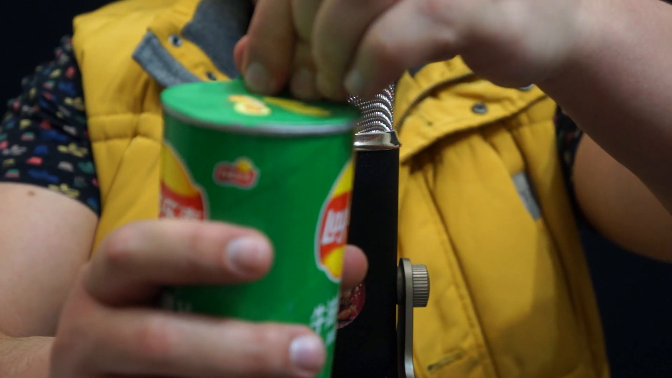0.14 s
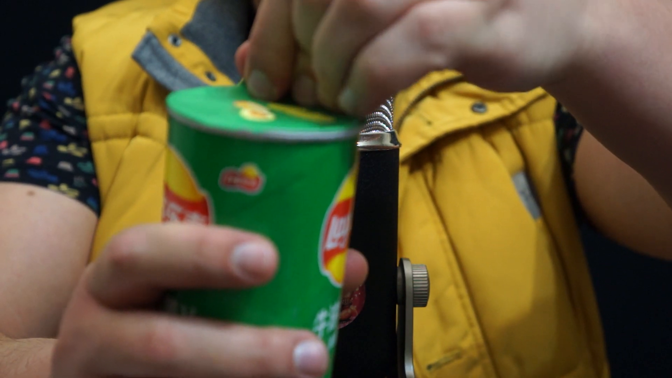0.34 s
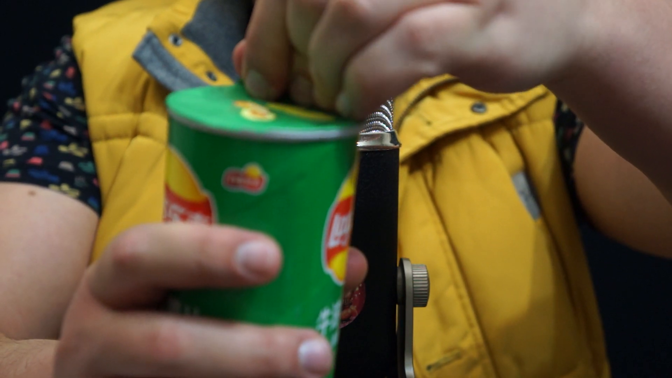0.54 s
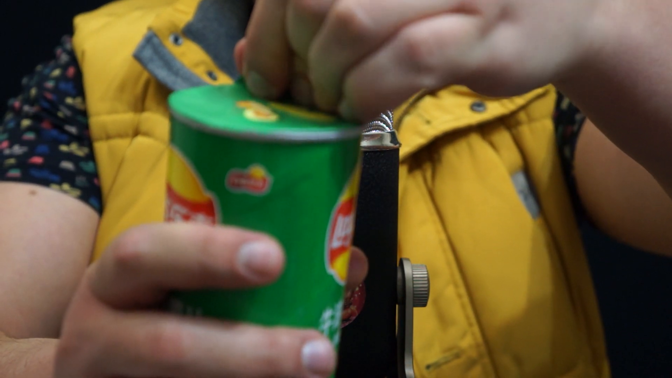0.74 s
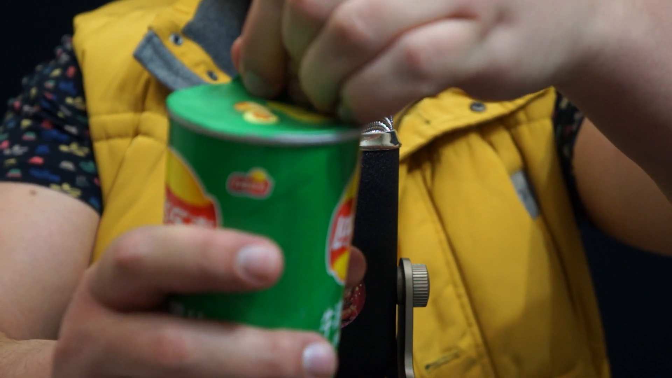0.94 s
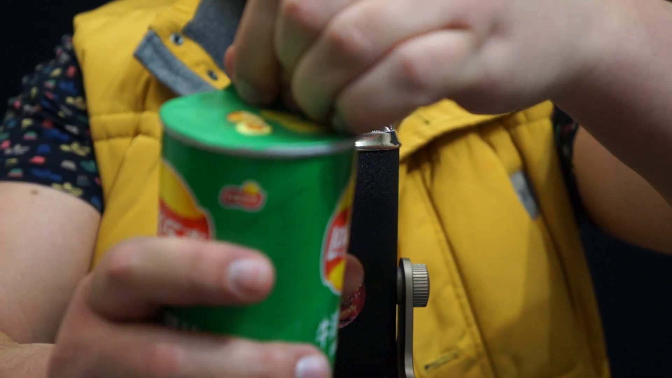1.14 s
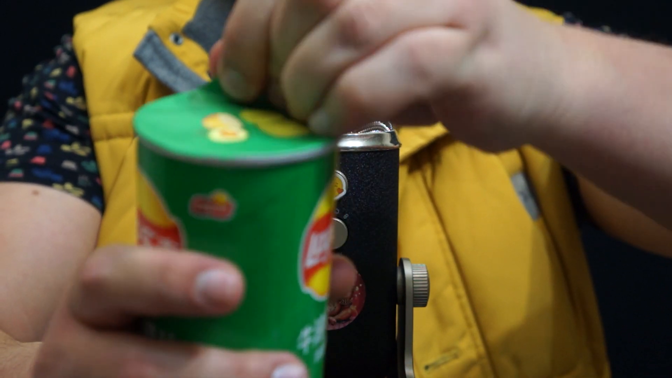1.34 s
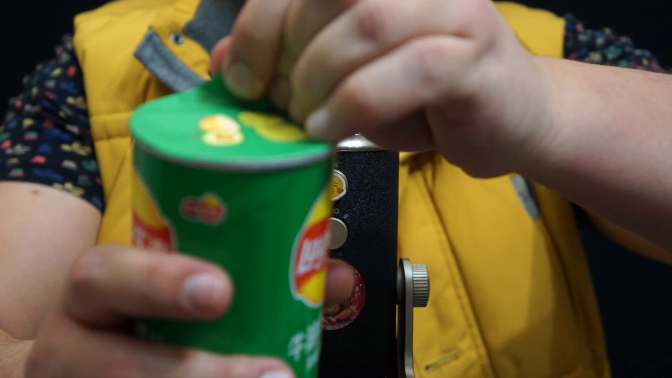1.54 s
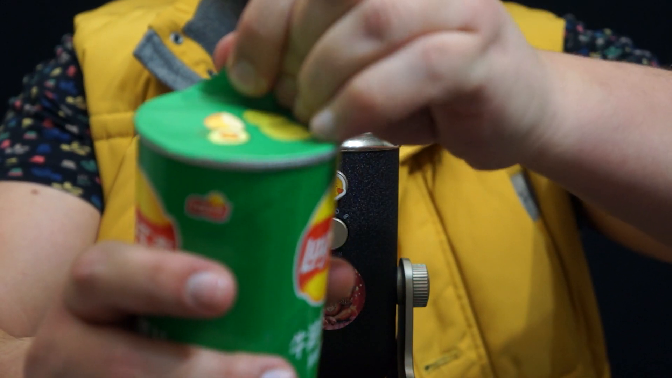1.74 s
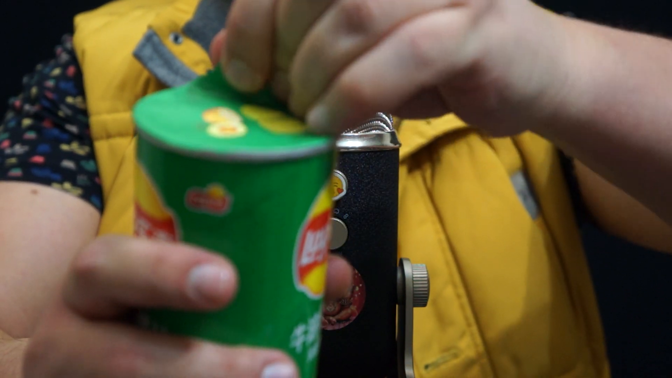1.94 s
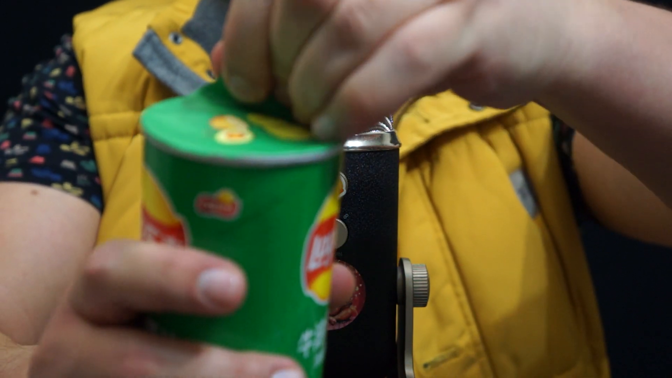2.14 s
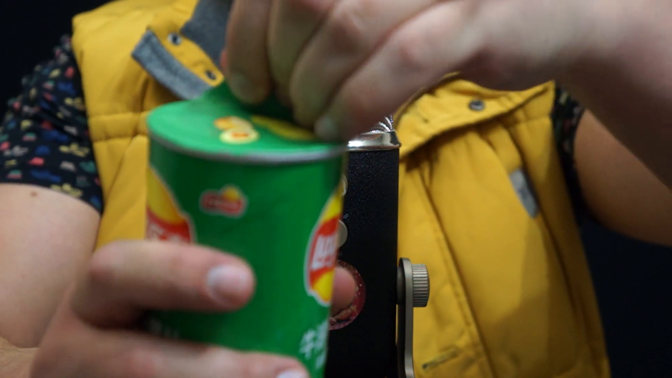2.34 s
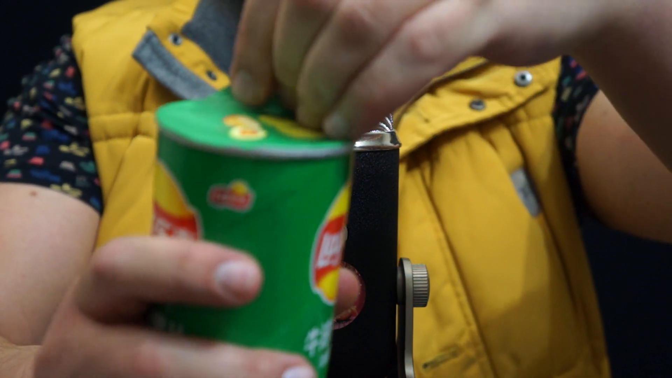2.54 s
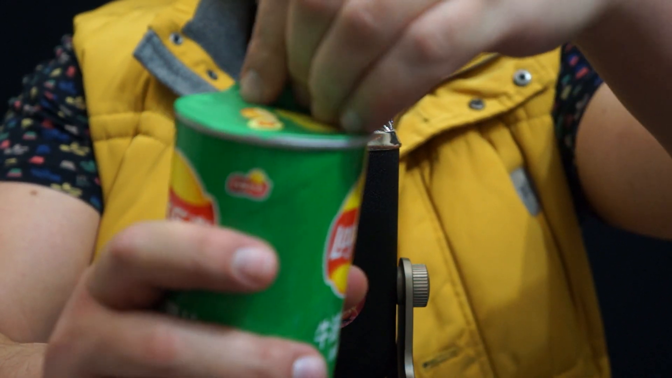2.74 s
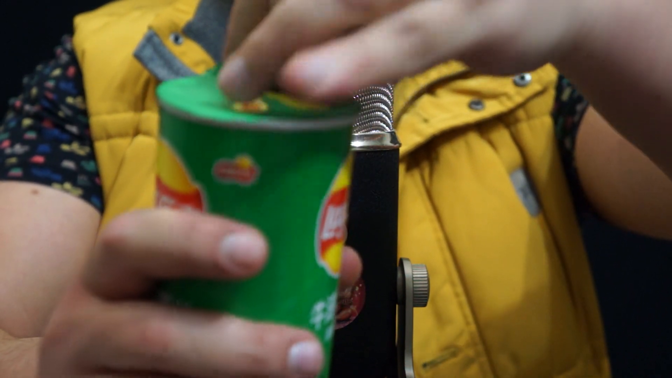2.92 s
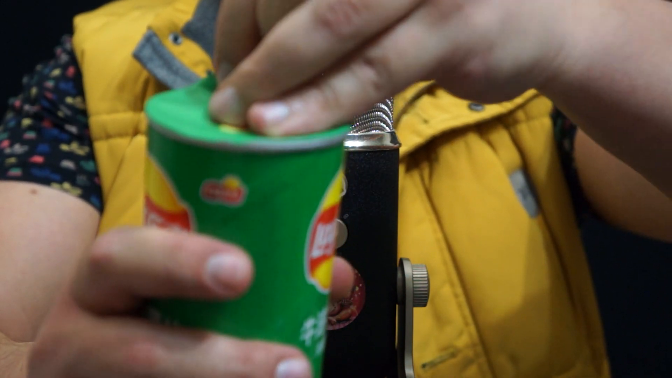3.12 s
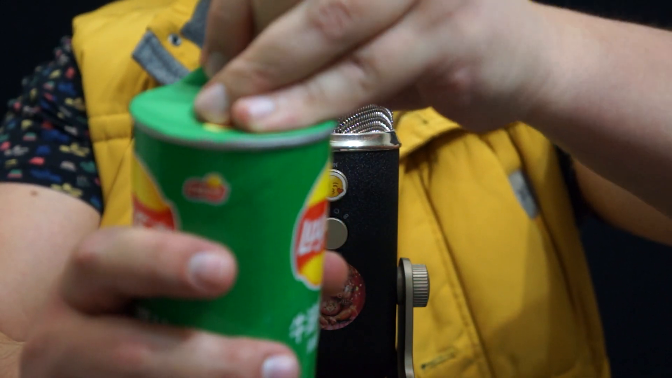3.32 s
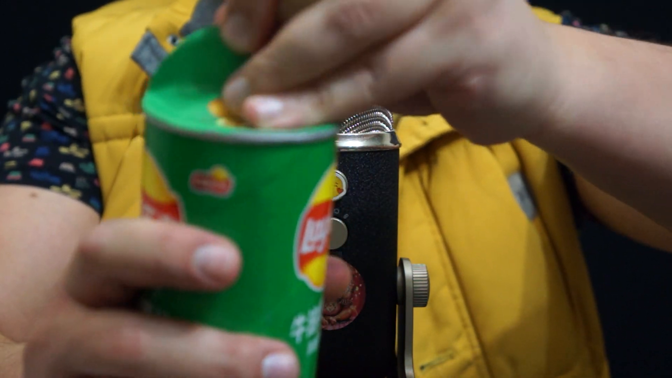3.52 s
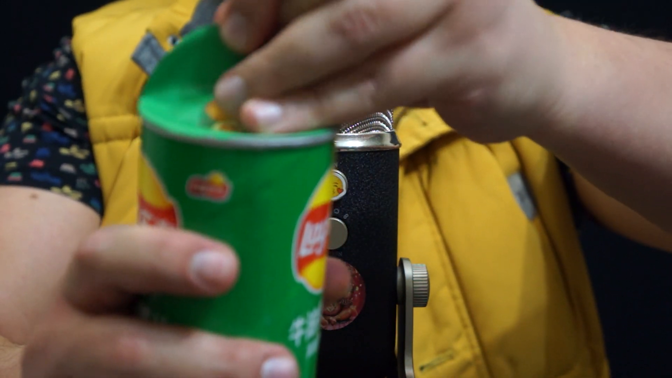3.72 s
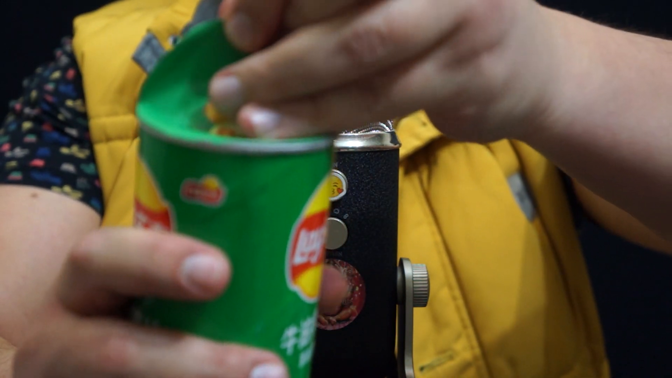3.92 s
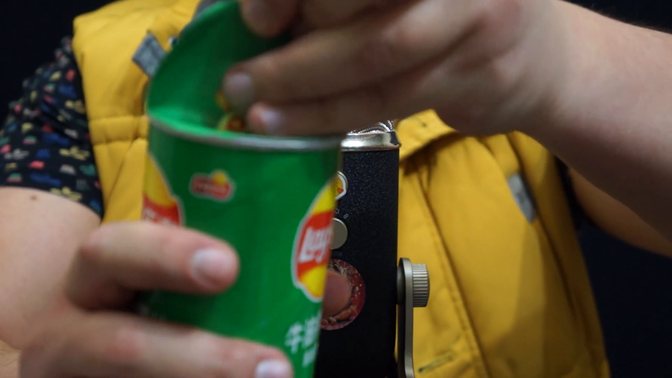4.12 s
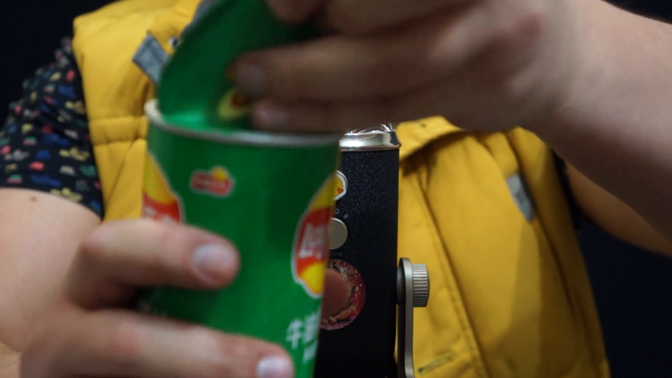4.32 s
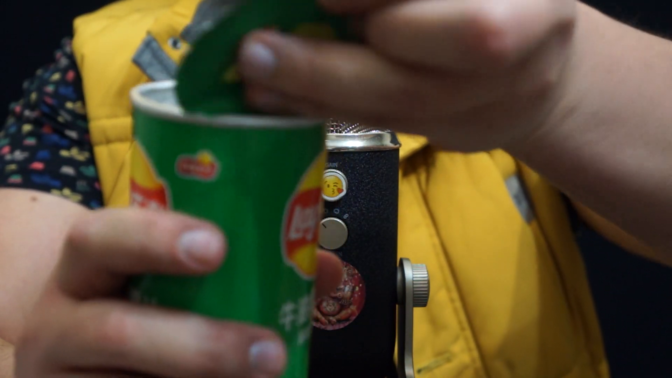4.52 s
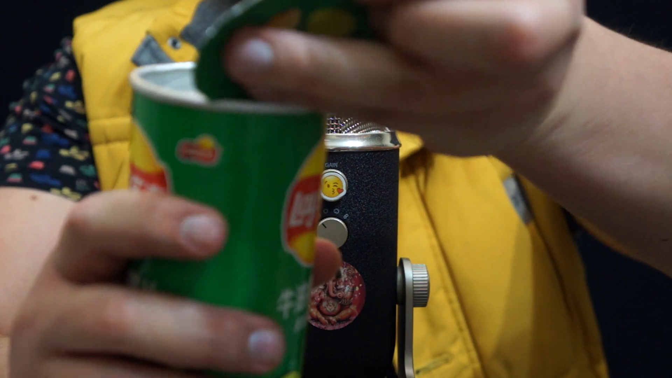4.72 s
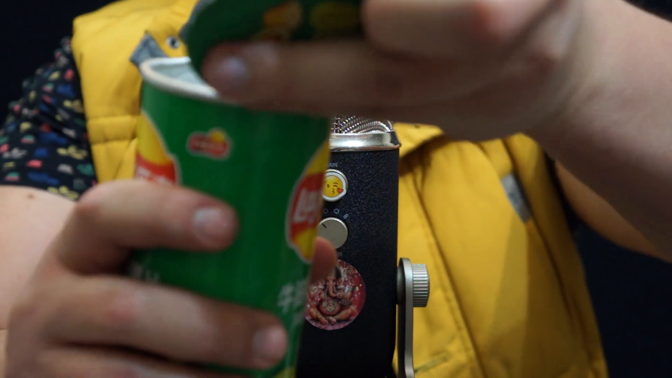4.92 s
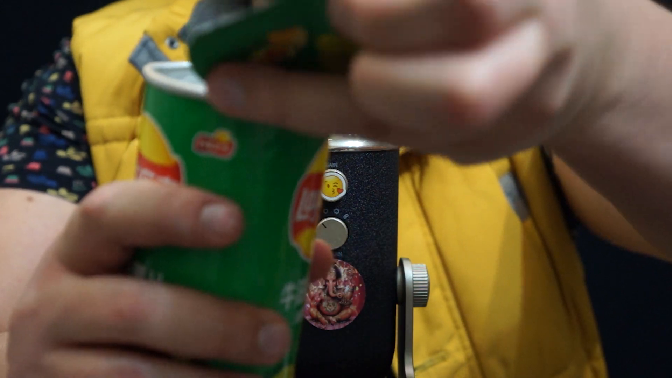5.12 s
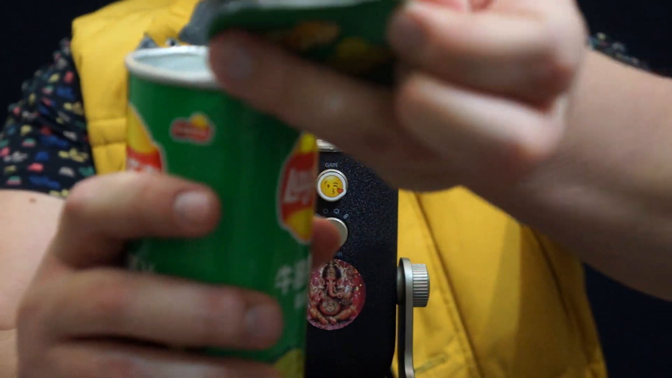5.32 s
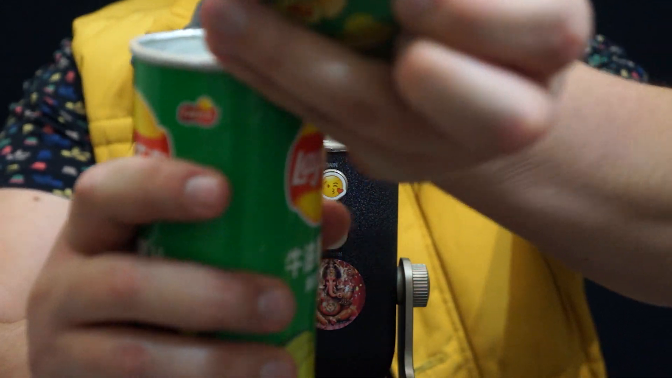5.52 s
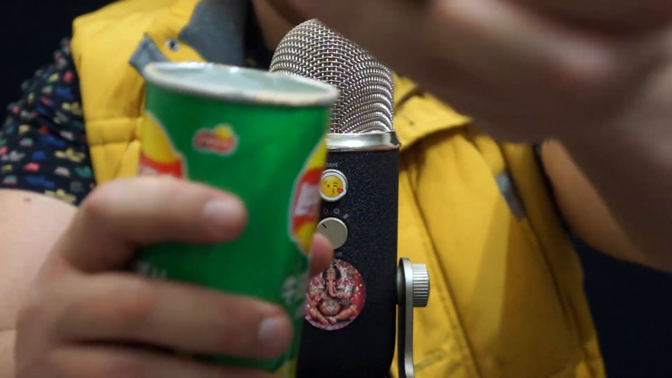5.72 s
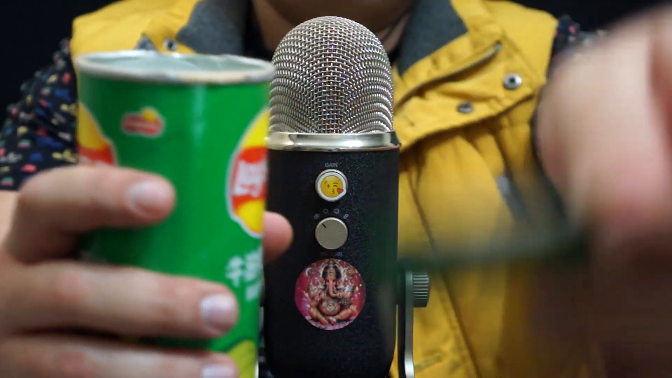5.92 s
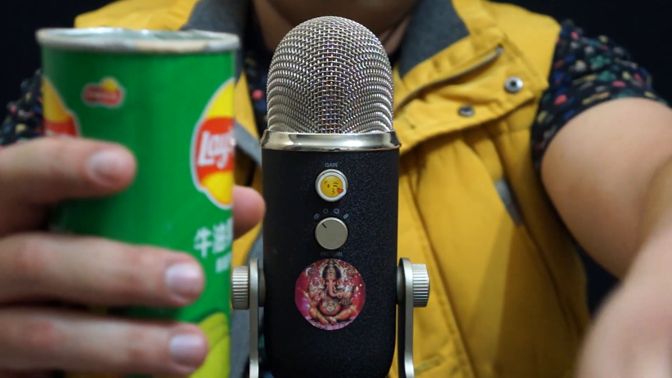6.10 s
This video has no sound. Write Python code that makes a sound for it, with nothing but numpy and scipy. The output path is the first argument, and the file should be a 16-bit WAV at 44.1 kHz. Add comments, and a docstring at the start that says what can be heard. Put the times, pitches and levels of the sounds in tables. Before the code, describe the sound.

Fingers tap and crinkle a foil seal on a cardboard can, then it rips loose with one sharp, hollow snap and rustles off, close up.

```python
"""A quiet room: a foil seal is picked at and peeled off a cardboard can close to a stereo microphone.
Fingers knock the taut foil (short drum tones), creases tick (brief noise bursts), and the foil tears off
or rustles briefly (dense crackle). Hands rustle the foil and rub the cardboard; the can's modes ring on
all of it, the lowest air tone retuned by the lid. Sparse reflections and steady hiss lie behind."""
import sys
import numpy as np
from scipy import signal
from scipy.fft import rfft, irfft
from scipy.io import wavfile
from scipy.ndimage import uniform_filter1d

SR = 44100
rng = np.random.default_rng(int(sys.argv[2]) if len(sys.argv) > 2 else 0)


def store_wav(level_fs):
    """Save 16-bit WAV to argv[1]."""
    pcm = np.round(np.clip(np.atleast_2d(level_fs), -1, 1) * 32767)
    wavfile.write(sys.argv[1], SR, pcm.T.astype(np.int16))


N = 271656

# Finger knocks on the foil drum. Each row: start in seconds, ring peak in dB, pitch in Hz,
# thump in dB re ring peak, crack in dB re ring peak.
KNOCKS = [(0.093, -57, 680, 1.5, -2), (0.231, -44, 775, 3, 7), (0.336, -55.5, 310, 11.5, -17),
          (0.455, -62.5, 660, -3, -8), (0.54, -53, 1156, -13, 2.5), (0.649, -38, 519, -7, -4.5),
          (0.771, -45.5, 570, -10, -5), (0.784, -54, 750, -22, -13), (0.814, -52, 593, -12, 2),
          (0.870, -41.5, 504, -10, -0.5), (0.905, -47, 663, -15, 6.5), (0.930, -43, 496, -32, 1.5),
          (1.189, -48.5, 1526, -7.5, 7), (1.245, -56, 332, 0, -20), (1.293, -48.5, 433, -4, -20),
          (1.343, -42, 325, -2, -13), (1.365, -46.5, 320, -17, -12), (1.375, -48, 604, -3, -12),
          (1.397, -45, 650, -2, -5), (1.461, -40, 550, -6, -4), (1.496, -41, 640, -4.5, -3.5),
          (1.733, -54, 363, 0, -2), (2.025, -49, 374, -2, -4), (2.055, -42.5, 340, 1, 1.5),
          (2.281, -44.5, 416, -4, -25), (2.334, -62, 330, -19, 14.5), (2.353, -46, 398, -28, -19),
          (2.460, -28, 701, -14, -12.5), (2.525, -46.5, 753, -18, -11), (2.539, -42.5, 590, -7, 4.5),
          (2.685, -57, 750, -12, -4), (2.771, -56.5, 970, -16, -3), (2.795, -46, 950, -19, -20),
          (2.817, -51, 860, -4, 3), (2.838, -30.5, 454, -10, -16), (3.024, -58.5, 804, 8.5, -31),
          (3.186, -49.5, 320, -7, -12), (3.223, -53, 347, 14, 13), (3.533, -24, 679, -5, -7),
          (3.572, -43.5, 740, 7, 13), (3.813, -39, 773, -3, -24), (4.094, -30.5, 753, -1, -33),
          (4.156, -39.5, 780, -5, -13), (4.18, -28, 717, -11, -45), (4.315, -49.5, 1270, -2, -17),
          (4.338, -47, 776, 5, -4), (4.366, -37.5, 787, -2.5, -36), (4.399, -42.5, 870, -6, -17),
          (4.46, -64, 664, -16, -15), (4.615, -49, 693, 1.5, 3), (4.784, -54.5, 657, 12, -13),
          (5.26, -56.5, 352, 3, -1), (5.673, -39, 570, 6, 1)]


def knocks():
    """Two short drum tones of the foil, a broad push of the whole can, a fingertip crack, a rattle inside."""
    out, t = np.zeros((2, N)), np.arange(4000) / SR
    decay_s, push_hz, rattle_db = 0.0016, 180, -11.0
    for start_s, ring_db, pitch_hz, thump_db, crack_db in KNOCKS:
        tones = np.sin(2 * np.pi * pitch_hz * t) + 0.5 * np.sin(2 * np.pi * 1.667 * pitch_hz * t)
        ring = tones * (t / 0.0017) ** 1.91 * np.exp(-t / decay_s)

        swing = np.exp(2j * np.pi * push_hz * t) * t * np.exp(-t / decay_s)  # barely one swing
        # each thump gets a random left-right spread
        thump = spread(swing.imag, swing.real, rng.uniform(-1.63, 1.45))

        noise = spread(*rng.standard_normal((2, len(t))), 0.47)
        crack = coloured(noise, lambda f: -6 * np.log2((f + 1) / 1700) ** 2)
        crack = crack * t ** 2.9 * np.exp(-t / 0.0012)

        # uneven grains, 40 samples each
        grains = noise * gain_of(4.5 * np.repeat(rng.standard_normal(len(t) // 40), 40))
        rattle = evened(coloured(grains, lambda f: -3.5 * np.log2((f + 1) / 1000) ** 2))
        rattle = rattle * np.minimum(t / 0.016, 1) * np.exp(-t / 0.012)

        sound = ring / ring.max()
        sound = sound + gain_of(thump_db) * thump / swing.imag.max()
        sound = sound + gain_of(crack_db) * crack / abs(crack).max()
        sound = sound + gain_of(rattle_db) * rattle
        add(out, start_s, gain_of(ring_db) * sound)
    return out


# Crease snaps. Each row: time in seconds, level at the top of the burst in dB, centre in Hz.
TICKS = [(0.377, -51, 7900), (0.4354, -48, 12200), (0.4593, -42, 12100), (0.5445, -53.5, 5560),
         (0.5803, -41, 12200), (0.711, -39, 13700), (0.7567, -46, 13000), (0.7706, -37.5, 7810),
         (0.7941, -48, 8430), (0.939, -57, 5000), (0.994, -50.5, 7900), (1.0234, -50.5, 5330),
         (1.043, -43, 12800), (1.1234, -51, 4230), (1.334, -50, 6420), (1.3915, -43, 13800),
         (1.4003, -43, 7660), (1.4982, -46, 13100), (1.554, -43, 14100), (1.712, -48, 7440),
         (1.7221, -33.5, 14100), (1.8254, -46.5, 10900), (1.8427, -49, 8630), (1.8864, -41.5, 11800),
         (1.9637, -39.5, 11600), (2.012, -48, 11800), (2.0516, -43, 7830), (2.186, -53, 7910),
         (2.233, -52, 7760), (2.4555, -54.5, 2730), (2.4992, -49, 3710), (2.5237, -42, 4500),
         (2.651, -49.5, 4270), (2.8477, -48, 7800), (3.026, -40.5, 3790), (3.1024, -45.5, 13400),
         (3.1487, -50, 14100), (3.1862, -33.5, 14200), (3.2256, -46, 4500), (3.336, -48, 14200),
         (3.353, -47.5, 5540), (3.3917, -48, 5600), (3.4595, -56, 11900), (3.5321, -21, 3290),
         (3.5422, -12.5, 3060), (3.548, -22.5, 6600), (3.5694, -24, 2620), (3.7755, -45, 7720),
         (3.812, -41, 3610), (3.9494, -54, 4150), (4.0936, -32, 3430), (4.157, -44, 3000),
         (4.373, -35, 3520), (4.4854, -48, 5860), (4.7825, -42.5, 13200), (4.925, -42.5, 7940),
         (4.9302, -43, 13500), (5.1295, -46.5, 7160), (5.205, -46, 8720), (5.3806, -38.5, 11700),
         (5.437, -42, 8760), (5.462, -46, 6950), (5.6494, -37.5, 9050), (5.6794, -23.5, 6910),
         (5.682, -25, 4350), (5.6903, -36, 6700)]
# a snap is broad, but narrow near the strongest resonance of the foil
SNAP_OCTAVES, RUNG_OCTAVES, RUNG_HZ, RUNG_REACH_OCTAVES = 1.34, 0.46, 6940, 0.47


def ticks():
    """Each snap of a crease is a noise burst a few milliseconds long around its own centre."""
    out, t = np.zeros((2, N)), np.arange(1024) / SR
    top_s, rise_s, fall_s = 0.0022, 0.0013, 0.0021
    burst = np.exp(-((t - top_s) / np.where(t < top_s, rise_s, fall_s)) ** 2)
    for time_s, level_db, centre_hz in TICKS:
        rung = np.exp(-(np.log2(centre_hz / RUNG_HZ) / RUNG_REACH_OCTAVES) ** 2)
        octaves = SNAP_OCTAVES + (RUNG_OCTAVES - SNAP_OCTAVES) * rung
        noise = spread(*rng.standard_normal((2, len(t))), 0.57)
        noise = coloured(noise, lambda f: np.maximum(-5 * (np.log2((f + 1) / centre_hz) / octaves) ** 2, -30))
        add(out, time_s - 0.0012, gain_of(level_db) * evened(noise) * burst)
    return out


# Foil tearing off, and short rustles of the foil. Each row: start in seconds, fall T60 in seconds,
# rms at full swell in dB, tilt in dB per octave.
TEARS_AND_RUSTLES = [(.235, 0.18, -59, -6.5), (.445, 0.096, -55, -0.5), (0.744, 0.15, -67, 6),
                     (0.886, 0.22, -59.5, 3), (1.107, 0.029, -49.5, 3.5), (1.367, 0.1, -60, -8),
                     (1.539, .09, -63, 2), (2.043, 0.11, -44.5, 5), (2.495, 0.18, -52.5, -6),
                     (2.841, 0.067, -50.5, -5), (3.016, 0.12, -50, -2), (3.52, 0.083, -27, -3),
                     (3.566, 0.15, -40.5, -2.5), (3.774, 0.13, -47.5, -1.5), (3.797, 0.14, -44, -2),
                     (4.082, 0.078, -37, -2), (4.14, 0.09, -43, -1.5), (4.344, 0.17, -40.5, -4),
                     (4.498, 0.13, -51.5, -7.5), (4.776, 0.19, -47.5, -3), (4.814, 0.054, -49, -3),
                     (4.33, 0.053, -42.5, -1), (4.9, 0.48, -55, 1), (5.011, 0.16, -50, 0.5),
                     (5.2, .15, -56, 3.5), (5.239, 0.21, -54, -4), (5.609, 0.15, -54.5, 1.5),
                     (5.66, 0.13, -37, -3.5), (5.856, 0.028, -59.5, -2)]
# Foil colour, used by these bursts and by the hands. Each row: frequency in Hz, gain in dB.
FOIL_COLOUR = [(600, 2), (1500, -6), (3000, -0.5), (5500, 4), (7800, 10.5), (9800, 0), (12000, 1.5),
               (16000, -7)]
BURST_RISE_SHARE, BURST_HOLD_S = 0.087, 0.022  # the rise as a share of the fall; the hold at full level


def tears_and_rustles():
    """Bursts of dense crackle that swell, hold, then fade: the foil tearing off, and short rustles of it."""
    out, t = np.zeros((2, N)), np.arange(16000) / SR
    for start_s, t60_s, level_db, tilt_db in TEARS_AND_RUSTLES:

        def burst_colour(f):
            tilt = tilt_db * np.log2(f / 3000 + 0.082)
            bass_cut = 8 * np.log2(1 + 500 / (f + 1))
            return read(FOIL_COLOUR, f) * 0.68 + tilt - bass_cut

        sides = [crackle(count=len(t), per_s=1000, spread_db=2.5, hiss=0.5) for side in range(2)]
        grains = coloured(spread(*sides, 0.4), burst_colour)
        rise_s = BURST_RISE_SHARE * t60_s
        fall_db = -60 * np.maximum(t - rise_s - BURST_HOLD_S, 0) / t60_s
        swell = np.minimum(t / rise_s, 1) ** 2 * gain_of(fall_db)
        add(out, start_s, gain_of(level_db) * evened(grains) * swell)
    return out


# Hands at work, interpolated. Each row: time in seconds, foil rustle in dB, its treble sheen in dB,
# grip on the cardboard in dB.
HANDS = [(0.0, -71, -76.5, -76), (0.62, -68, -72, -73.5), (0.74, -53.5, -70, -67), (1.02, -85, -79, -68),
         (1.22, -57.5, -72, -77), (1.56, -63, -64, -74), (1.78, -65.5, -72, -84), (1.92, -71, -73, -74.5),
         (2.05, -89, -63, -67.5), (2.28, -62.5, -76, -68), (2.4, -103, -96, -65.5), (2.8, -73, -103, -67),
         (3.2, -84, -78, -63.5), (3.34, -59, -71, -83), (3.5, -55.5, -63, -63.5), (3.72, -66, -103, -65.5),
         (4.0, -65.5, -76, -72), (4.07, -55.5, -65, -62.5), (4.26, -64.5, -84, -69), (4.348, -50, -67, -48),
         (4.62, -52.5, -70, -59), (4.75, -63.5, -69, -69.5), (4.89, -60, -62, -62),
         (5.12, -66.5, -74, -65.5), (5.3, -57.5, -57, -72), (5.46, -55.5, -64, -70.5), (5.6, -78, -99, -64),
         (6.0, -76, -97, -68), (6.16, -59.5, -85, -65.5)]
# Treble sheen of the rustle. Each row: frequency in Hz, gain in dB.
SHEEN_COLOUR = [(7000, -39), (9800, -6), (12000, 15.5), (14500, 10), (16500, 8)]
# Dull rub on cardboard. Each row: frequency in Hz, gain in dB.
GRIP_COLOUR = [(30, -8), (70, -4), (150, 3), (400, -3), (900, -7), (1800, -13), (4000, -17.5)]


def hands():
    """Foil rustle, its bright sheen and the dull rub of fingers on cardboard, spread over some width."""
    time_s, *levels = np.transpose(HANDS)
    foil_db, sheen_db, grip_db = (np.interp(np.arange(N) / SR, time_s, c) for c in levels)
    layers = []
    for side in range(2):
        grains = crackle(count=N, per_s=700, spread_db=3, hiss=0.55)
        foil = gain_of(foil_db) * evened(coloured(grains, lambda f: read(FOIL_COLOUR, f)))
        sheen = gain_of(sheen_db) * evened(coloured(grains, lambda f: read(SHEEN_COLOUR, f)))
        rub = crackle(count=N, per_s=250, spread_db=2, hiss=0.8)
        grip = gain_of(grip_db) * evened(coloured(rub, lambda f: read(GRIP_COLOUR, f)))
        layers.append(foil + sheen + grip)
    return spread(*layers, 0.51)


# Effect of the lid on the can, interpolated. Each row: time in seconds, lowest air tone in Hz,
# coupling of the foil to the can in dB.
LID = [(0, 202, -93), (2.2, 166, -95), (2.28, 169, -43), (2.5, 167.4, -40), (2.6, 205, -57),
       (2.75, 170, -81), (3.45, 174, -57), (3.526, 167, -51.5), (3.556, 267.6, -43), (3.62, 268, -24.5),
       (3.75, 271.6, -41), (4.0, 277, -48), (4.095, 283, -36), (4.16, 270.7, -38), (4.6, 283, -53.5),
       (5.5, 297.6, -46), (5.65, 278, -57), (6.12, 203, -48)]
# Upper modes of the can. Each row: frequency in Hz, T60 in seconds, gain in dB.
CAN_MODES = [(466, 0.025, -49), (767, 0.042, -49), (1340, 0.017, -44.5), (2240, 0.1, -56)]
AIR_TONE_T60_S = 0.17


def can(shaking, push):
    """The can rings on whatever shakes it; the gap under the lid tunes its lowest air tone."""
    time_s, *columns = np.transpose(LID)
    air_hz, coupling_db = (np.interp(np.arange(N) / SR, time_s, c) for c in columns)
    air_tone = ringing(push * gain_of(coupling_db), air_hz, AIR_TONE_T60_S)
    return air_tone + sum(gain_of(db) * ringing(shaking, hz, t60_s) for hz, t60_s, db in CAN_MODES)


# Phase lead of left over right. Each row: frequency in Hz, lead in radians.
LEFT_LEADS = [(30, .9), (400, .6), (1500, .3), (3000, .7), (5000, 1.6), (8000, 2.9), (12000, 4.1),
              (16000, 4.8)]


def ports(x):
    """The sound reaches the left capsule a little ahead of the right one."""
    half_lead = read(LEFT_LEADS, np.fft.rfftfreq(N, 1 / SR)) / 2
    return irfft(rfft(x) * np.exp(1j * np.array([half_lead, -half_lead])), N)


# Room decay. Each row: frequency in Hz, T60 in seconds.
ROOM_DECAY = [(150, 0.22), (400, 0.29), (1040, 0.33), (2760, 0.38), (7280, 0.19)]


def room(x):
    """Sparse reflections of random sign, each band dying at its own speed."""
    taps = np.zeros((2, SR // 2))
    # one reflection in every 20 samples
    at = np.arange(200, SR // 2 - 20, 20) + rng.integers(0, 20, (2, (SR // 2 - 201) // 20))
    np.put_along_axis(taps, at, rng.choice([-1.0, 1.0], at.shape), 1)
    hz, t, bands = signal.stft(taps, SR, nperseg=256)
    decay = gain_of(-60 * t / read(ROOM_DECAY, hz)[:, None])
    tail = signal.istft(bands * decay, SR, nperseg=256)[1]
    return signal.fftconvolve(x, tail / np.linalg.norm(tail[0]), axes=1)[:, :N]


# Left-right likeness of the hiss. Each row: frequency in Hz, correlation from 0 to 1.
AIR_SAME = [(40, 0.25), (300, 1), (1000, 0.17), (4000, 0.28), (16000, 0.247)]
# Colour of the hiss. Each row: frequency in Hz, relative spectral level in dB.
AIR_COLOUR = [(20, -21), (60, -65), (200, 7.5), (800, -1.5), (4000, 1.5), (6000, -5), (7700, 0.5),
              (9800, -4.5), (15000, -64), (16500, -50)]
AIR_RMS_DB = -71


def air():
    """Steady room tone and microphone hiss: coloured noise, partly shared between the sides."""
    hz = np.fft.rfftfreq(N, 1 / SR)
    a, b = rfft(rng.standard_normal((2, N)))
    same = np.clip(read(AIR_SAME, hz), -1, 1)
    both = np.array([a, same * a + np.sqrt(1 - same ** 2) * b]) * gain_of(read(AIR_COLOUR, hz))
    return gain_of(AIR_RMS_DB) * evened(irfft(both, N))


def crackle(count, per_s, spread_db, hiss):
    """Tiny noise bursts of uneven size over a fine hiss, bunched in clumps of a few hundredths of a second."""
    size = gain_of(spread_db * np.minimum(rng.exponential(1, count), 3))
    bursts = signal.lfilter([1], [1, -0.93], size * (rng.random(count) < per_s / SR))
    slow = uniform_filter1d(rng.standard_normal(count), size=700)
    clumps = evened(uniform_filter1d(slow, size=700))
    return (evened(bursts) + hiss) * rng.standard_normal(count) * gain_of(2.96 * clumps)


def ringing(x, hz, t60_s):
    """One decaying mode driven by x; its frequency may follow a curve."""
    turn = np.exp(2j * np.pi * np.cumsum(hz * np.ones(N)) / SR)
    # shift the mode to 0 Hz, let it decay there, shift back
    decayed = signal.lfilter([1], [1, -10 ** (-3 / (t60_s * SR))], x / turn)
    return 2 * (turn * decayed).real


def spread(centre, edge, width):
    """A source of some size: a shared part and a part of opposite sign left and right."""
    return centre + width * np.outer([1, -1], edge)


def coloured(x, db_of_hz):
    """Filters x by a gain curve in dB over frequency."""
    n = x.shape[-1]
    return irfft(rfft(x) * gain_of(db_of_hz(np.fft.rfftfreq(n, 1 / SR))), n)


def read(points, hz):
    """Reads a curve of (Hz, value) points on a log frequency axis."""
    f, value = np.transpose(points)
    return np.interp(np.log(hz + 1), np.log(f + 1), value)


def gain_of(db):
    """Amplitude factor of a level in dB."""
    return 10 ** (np.asarray(db) / 20)


def evened(x):
    """Scales x to an rms of 1."""
    return x / np.sqrt(np.mean(x ** 2) + 1e-20)


def add(mix, start_s, sound):
    """Adds a sound into the mix in place, cut at the end."""
    part = mix[:, max(round(start_s * SR), 0):][:, :sound.shape[-1]]
    part += sound[..., :part.shape[1]]


def scene():
    """Blows and rustle shake the can; all of it is heard directly and through the room, over the air."""
    blows = knocks() + ticks() + tears_and_rustles()
    rustle = hands()
    rub_to_air_db, room_db = -0.5, -8.0  # rustle and rubbing stir the air tone nearly as much as blows do
    push = blows + gain_of(rub_to_air_db) * rustle
    near = blows + rustle + can(blows + rustle, push)
    return ports(near) + gain_of(room_db) * room(near) + air()


def record(dry):
    """The microphone rolls off the deepest bass; then the band limit of the recorder."""
    bass_cut_hz, edge_hz = 45, 16100
    heard = signal.lfilter(*signal.butter(2, bass_cut_hz, "high", fs=SR), dry)
    band_limit = signal.firwin(255, edge_hz, window=("kaiser", 7), fs=SR)
    return signal.oaconvolve(heard, band_limit[None], "same")


dry = scene()
out = record(dry)
store_wav(out)
```